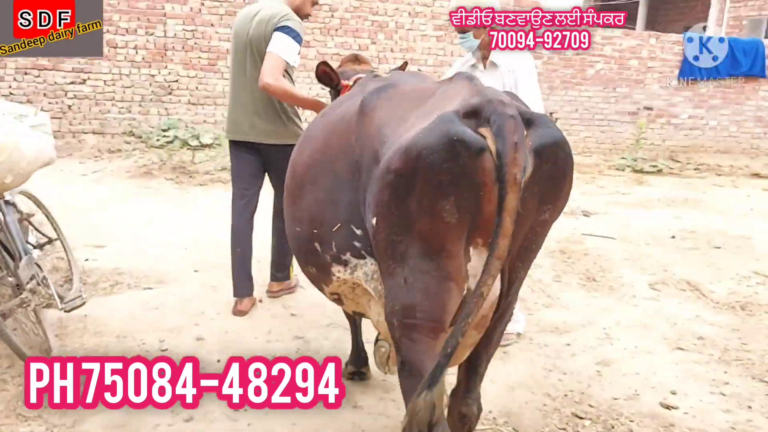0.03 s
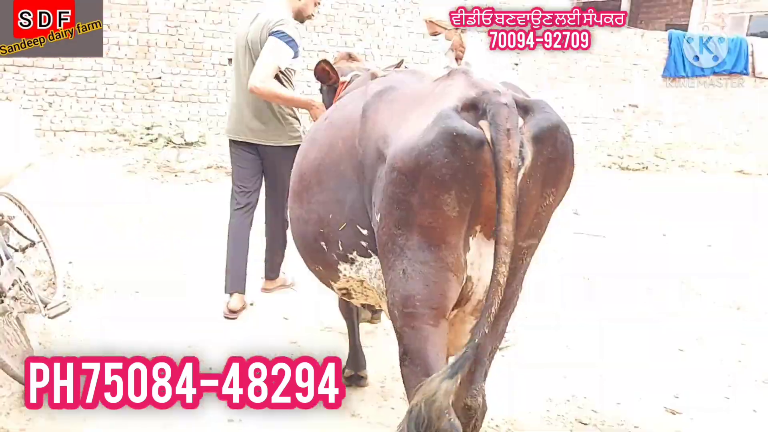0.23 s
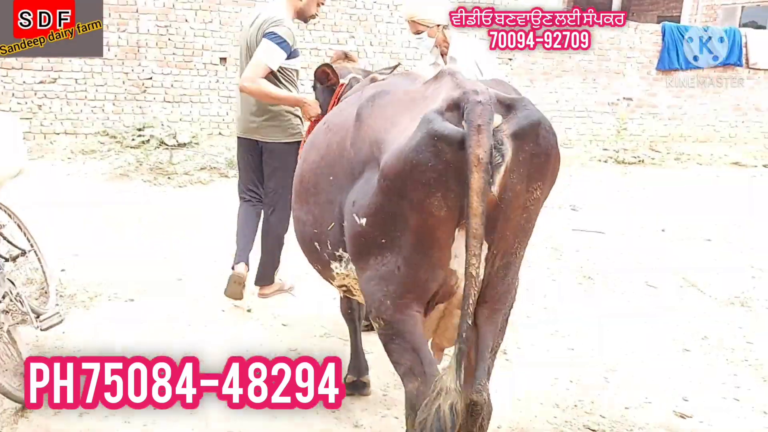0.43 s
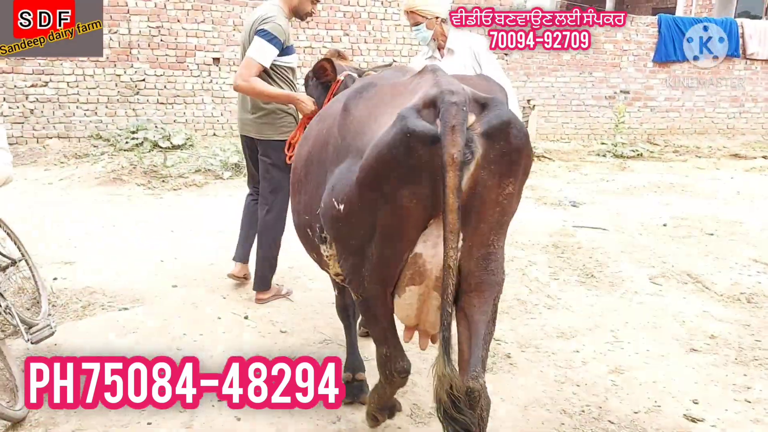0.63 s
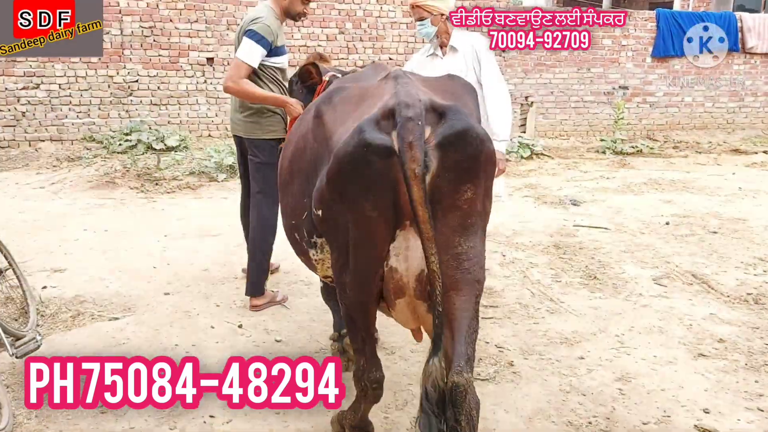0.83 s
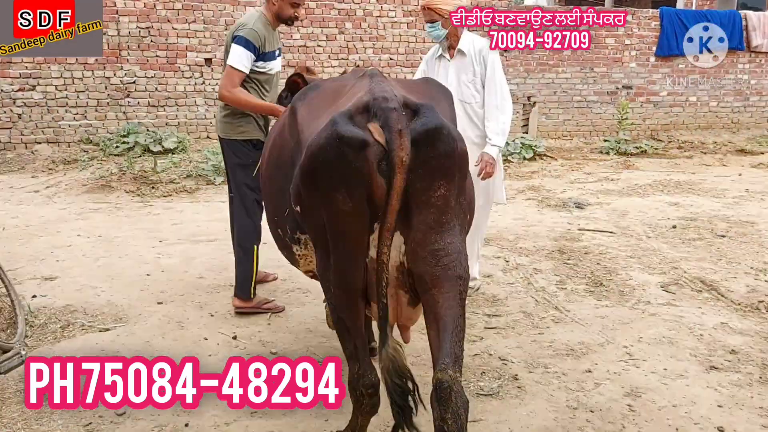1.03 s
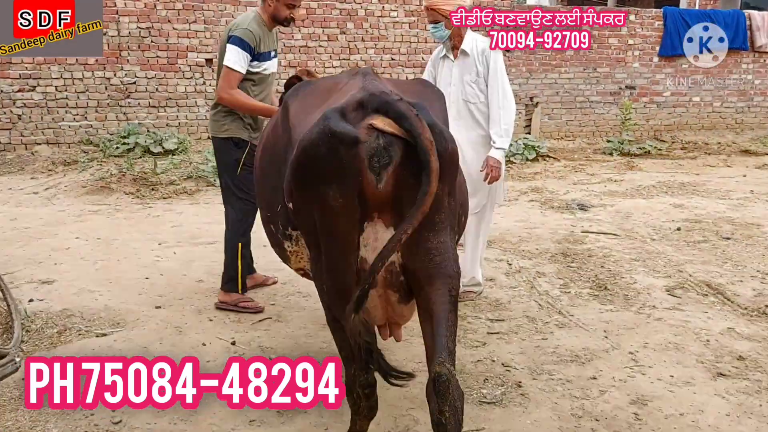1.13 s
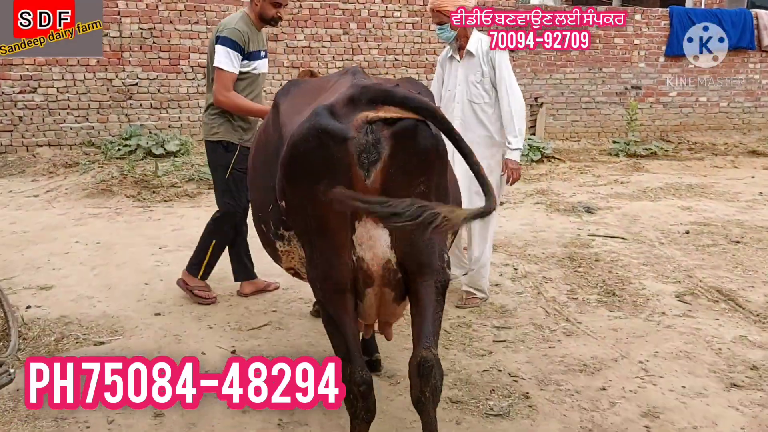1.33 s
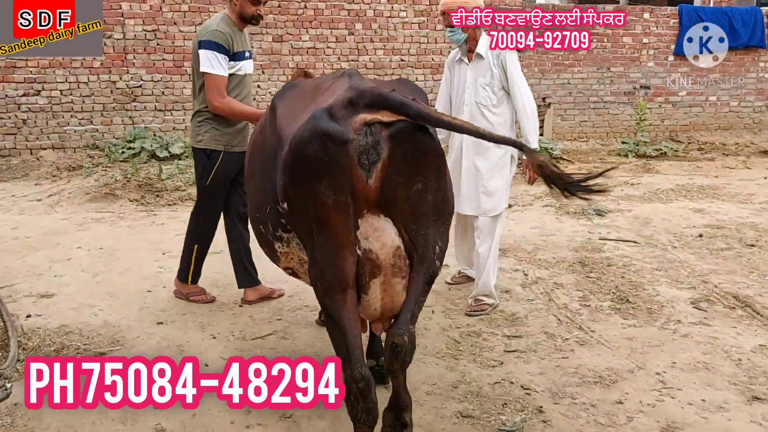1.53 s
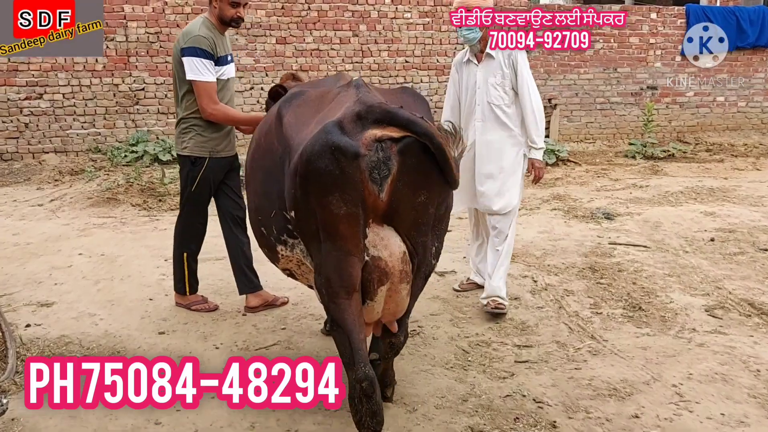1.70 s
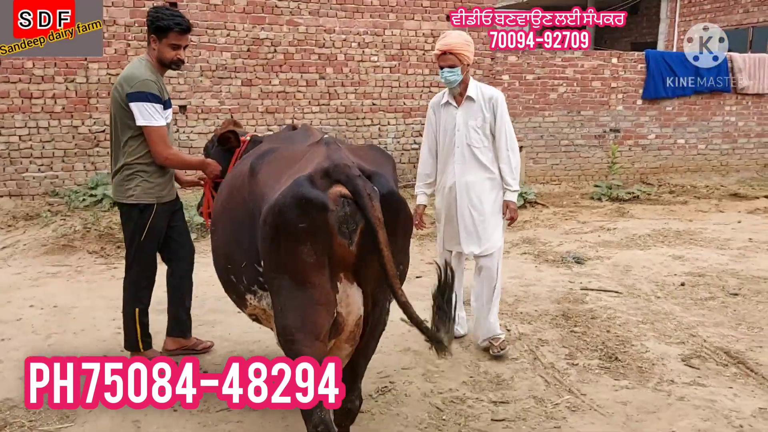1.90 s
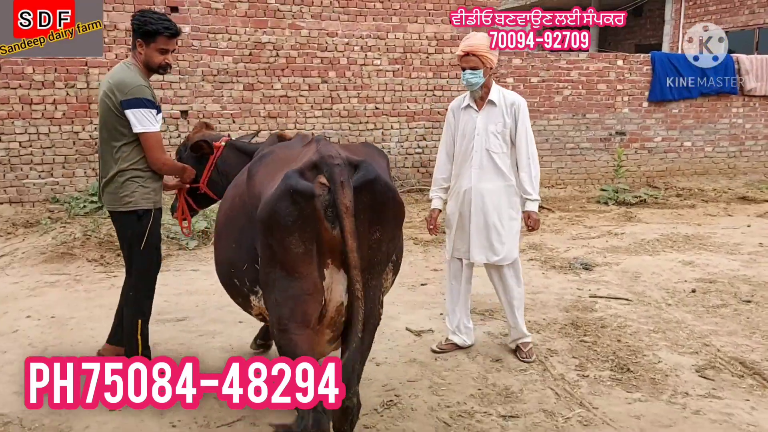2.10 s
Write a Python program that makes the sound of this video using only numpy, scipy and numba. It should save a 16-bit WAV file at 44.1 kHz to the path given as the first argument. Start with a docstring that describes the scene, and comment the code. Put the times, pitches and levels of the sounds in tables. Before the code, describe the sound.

Single deep cow moo swelling from closed-mouth hum to open bellow, with hooves scuffing dry dirt

```python
"""A quiet outdoor bed of shaped noise runs throughout, with hooves and feet scuffing (gated, gritty hiss)
and knocking (damped sines plus noise) on dry dirt. A cow led over the yard gives a soft falling grunt, then
one moo: a rough hum through the nearly shut mouth, a clear open-mouthed bellow and a hoarse, creaking fall
as the mouth closes. Uneven vocal-fold pulses ring moving resonances; small clicks tick during the moo.
Brick walls echo the voice, knocks and clicks."""
import sys
import numpy as np
from scipy import signal
from scipy.fft import rfft, irfft
from scipy.io import wavfile
from scipy.ndimage import map_coordinates
from numba import njit

SR = 44100
rng = np.random.default_rng(int(sys.argv[2]) if len(sys.argv) > 2 else 0)


def file_out(sig):
    """Save sig as 16-bit WAV at sys.argv[1]."""
    # one column per channel
    cols = np.atleast_2d(sig).T
    # limit, then scale
    lim = np.clip(cols, -1, 1)
    pcm = np.round(lim * 32767).astype(np.int16)
    wavfile.write(sys.argv[1], SR, pcm)


N = 95079
T = np.arange(N) / SR
FREQ = np.arange(N + 1) * SR / (2 * N)  # bins of a double-length transform, Hz

# outdoor background spectrum before scaling to unit power [f/Hz, level/dB]
AIR_COLOUR = [(20, -18), (55, -1), (90, -2), (150, 1), (280, -9.5), (480, -7.5), (1000, -18), (1800, -19),
              (2600, -27.5), (5000, -32), (12000, -33.5), (15500, -35)]
AIR_DB, AIR_WANDER_DB, AIR_WIDE_HZ = -58, -2, 1800

# feet dragged over dry dirt [start t/s, length/s, level/dB]
SCUFFS = [(-.02, 0.05, -50.5), (0.03, 0.14, -62.5), (0.177, 0.065, -59), (0.969, 0.28, -44.5),
          (1.25, 0.26, -55), (1.429, 0.041, -58), (1.689, 0.18, -69), (2.127, 0.08, -45)]
# scuff spectrum before scaling to unit power [f/Hz, level/dB]
SCUFF_COLOUR = [(300, 8.5), (2000, 6.5), (4500, -1), (7500, -7.5), (11000, -5), (13500, -5.5), (16000, -47)]
SCUFF_ATTACK_S, SCUFF_RELEASE_S, GRIT_DB = 0.0094, 0.0086, 2

# steps on packed earth [t/s, level/dB, decay/s, knock f/Hz]
STEPS = [(0.088, -42, 0.0016, 406), (.193, -44, 0.0058, 393), (.242, -50, 0.0033, 380),
         (0.282, -49.5, 0.0041, 384), (.379, -47, 0.004, 500), (0.4291, -42.5, 0.0054, 450),
         (.489, -51, .003, 930)]
# spectrum of tick and crumble before scaling to unit power [f/Hz, level/dB]
STEP_COLOUR = [(60, -17), (200, 8.5), (480, 15.5), (900, 2.5), (2300, -1.5), (5000, -18), (15000, -36)]
STEP_TICK_DB, STEP_CRUMBLE_DB = -1, -2.5  # relative to each step's level

# opening grunt [t/s, pitch f/Hz, overtone source level/dB, fundamental level/dB]
GRUNT = [(.49, 151, -88, -74), (.53, 148, -82, -66), (.585, 141.8, -73, -65), (.608, 139.9, -52.5, -42.5),
         (.635, 137.9, -40, -50), (.67, 132.8, -35, -43.5), (.71, 128.6, -35.5, -52),
         (.745, 128.2, -33, -46), (.79, 120, -68.5, -73)]
# grunt resonances before scaling to unit power [f/Hz, level/dB]
GRUNT_COLOUR = [(70, -15.5), (135, 6), (270, -4.5), (400, -23), (650, -14.5), (1000, -19.5), (2000, -18),
                (2700, -22.5), (3200, -38.5), (5000, -29), (7000, -63)]
GRUNT_ROUGH, GRUNT_CREAK, GRUNT_OVERTONES_HZ = .4, .4, 189  # hoarseness and creak run 0-1

# pitch of the moo [t/s, f/Hz]
MOO_PITCH = [(.72, 87), (.824, 99.64), (.918, 110.6), (1.0, 118.7), (1.08, 121.7), (1.13, 122.6),
             (1.44, 121.9), (1.54, 120.4), (1.67, 117.8), (1.76, 115.2), (1.84, 110.1), (1.92, 105.4),
             (2.0, 102.4), (2.15, 97.2)]
# effort driving the folds [t/s, source level/dB]
MOO_EFFORT = [(.69, -80), (.735, -39), (.785, -36), (.81, -31), (.92, -34), (.98, -34), (1.04, -33),
              (1.10, -26), (1.22, -25), (1.42, -24.5), (1.53, -24.5), (1.62, -26.5), (1.8, -26),
              (1.88, -27), (1.95, -30), (2.01, -28.5), (2.07, -38.5), (2.11, -46.5), (2.16, -54)]
# level of the moo's fundamental [t/s, level/dB]
MOO_FUNDAMENTAL = [(.7, -59), (.77, -47), (.82, -41.5), (.92, -36.5), (.975, -41.5), (1.02, -63),
                   (1.075, -39), (1.13, -48), (1.5, -48), (1.68, -50), (1.74, -49), (1.83, -42.5),
                   (1.895, -33.5), (1.97, -41), (2.02, -57), (2.08, -41), (2.12, -51), (2.16, -40)]
# unevenness of the voice [t/s, hoarseness 0-1, creak 0-1]
MOO_ROUGH = [(.72, .7, .5), (.88, .3, .2), (1.02, .16, .05), (1.1, .03, .02), (1.3, .02, .01),
             (1.68, .04, .03), (1.8, .15, .1), (1.92, .22, .28), (1.98, .45, .8), (2.15, .6, .9)]
# mouth opening [t/s, opening: 0 shut, .5 half, 1 wide]
MOUTH = [(1.03, 0.12), (1.075, 0.9), (1.2, 1), (1.5, 0.76), (1.62, 0.82), (1.74, .64), (1.88, 0.59),
         (2.08, 0.36), (2.13, 0.31)]
# throat and mouth resonances, mouth shut, before scaling to unit power [f/Hz, level/dB]
SHUT_MOUTH = [(100, -36), (190, -18), (222, -6.5), (238, 1.5), (290, -7.5), (450, -40), (600, -15.5),
              (740, -18.5), (940, -9), (1150, -12), (1400, -21), (1650, -26.5), (1780, -11.5), (2080, -6),
              (2300, -16), (2510, -14), (2720, -38.5), (3230, -18), (3500, -39), (3850, -29), (4900, -47),
              (5500, -45.5), (8000, -51.5)]
# the same, mouth half open [f/Hz, level/dB]
HALF_MOUTH = [(100, -32), (170, 1.5), (230, -15), (340, -13), (410, 1.5), (455, 5), (550, -14.5), (620, -4),
              (720, -16), (860, -6), (1120, -29.5), (1280, -18), (1420, -8), (1540, -3), (1700, -11.5),
              (1950, -20), (2250, -18), (2600, -34), (2850, -13), (3020, -32.5), (3300, -26), (3600, -22.5),
              (4400, -25.5), (5200, -46), (8000, -52.5)]
# the same, mouth wide open [f/Hz, level/dB]
WIDE_MOUTH = [(122, -26), (244, -16.5), (366, -24.5), (488, -2.5), (610, -24), (732, -20.5), (855, 0.5),
              (977, -11.5), (1100, -27), (1222, -6.5), (1344, -13), (1466, -1.5), (1590, -8.5),
              (1710, -2.5), (1835, -13), (2200, -12.5), (2440, -13), (2570, -36), (2690, -23), (2810, -12),
              (2930, -30), (3180, -16), (3400, -33.5), (3550, -13), (3790, -31.5), (4250, -22), (4700, -76),
              (5300, -38), (6000, -46), (8000, -63.5)]
# lower resonance moving with jaw and tongue [t/s, centre f/Hz, lift/dB]
LOWER = [(1.06, 1470, -1.5), (1.28, 1466, 4.5), (1.52, 1450, 8), (1.63, 1435, 2.5), (1.9, 1410, 13.5),
         (2.03, 1500, 6)]
# middle resonance moving with jaw and tongue [t/s, centre f/Hz, lift/dB]
MIDDLE = [(1.22, 1712, 7), (1.4, 1640, 3.5), (1.62, 1644, 9.5), (1.75, 1690, 10.5), (1.9, 1720, 3),
          (2.01, 1880, 9)]
# upper resonance moving through the call [t/s, centre f/Hz, lift/dB]
UPPER = [(1.02, 3110, 6), (1.11, 3090, 17.5), (1.19, 2880, 13), (1.25, 2790, 7), (1.35, 2680, 12.5),
         (1.56, 2820, 9), (2.0, 2910, -3)]
# broad nasal resonance sinking as the call starts [t/s, centre f/Hz, lift/dB]
NASAL = [(.7, 4493, 25.5), (.82, 4000, 8.5), (.95, 3300, 1)]
LOWER_WIDTH_HZ, MIDDLE_WIDTH_HZ, UPPER_WIDTH_HZ, NASAL_WIDTH_HZ = 27, 140, 45, 500
OVERTONES_HZ, NOSE_SMEAR_S = 135, .008

# vocal folds, shared by grunt and moo
JITTER_CYCLES, JITTER_HZ = .025, 219.9  # timing spread at full hoarseness, rate of change
CREAK_SIZE_DB, CREAK_CYCLES, CREAK_ALTERNATION = 4, .05, .35  # size and timing scales at full creak
PULSE_TOP_HZ, PULSE_SPREAD_S, HISS_DB = 4000, .0055, -3  # hiss level before its high-pass
RASP_DB, RASP_SHARE, RASP_LOW_HZ = 6, 0.79, 1600  # level at full hoarseness, decay in cycles, low cut

# small clicks [t/s, level/dB, ring f/Hz, width/Hz, decay/s]
CLICKS = [(1.041, -26.5, 1490, 130, 0.022), (1.776, -47.5, 8700, 9000, 0.0033),
          (1.81, -28.5, 2200, 690, 0.0045), (1.8144, -56, 10000, 9000, 0.0012),
          (2.062, -53.5, 7000, 9000, 0.0014)]

# wall echoes [delay left/s, delay right/s, level/dB]
WALLS = [(.0328, .0246, -16), (.071, .0665, -18)]
# scatter off the ground and nearby bodies, then off the yard [t60/s, level/dB]
TAILS = [(.11, -6), (.45, -15)]
YARD_DULL_HZ, YARD_THIN_HZ, YARD_WIDE_HZ, YARD_DRIFT_HZ = 6200, 278, 700, .6
# phase between the two microphone ports [f/Hz, left lead/rad]
PORT_PHASE = [(490, 1.16), (850, -1.59), (980, -2.5), (1200, 4.13), (1340, -1.5), (1470, -3), (1590, -2.5),
              (1710, -2), (2300, -3), (2800, 0.5), (4600, -3), (15000, -15)]
# balance of the two microphone ports [f/Hz, left minus right level/dB]
PORT_BALANCE = [(60, 0), (240, 0), (360, 3), (480, -2), (610, -4), (850, -6.5), (980, -7), (1100, 0),
                (1340, -5), (1470, -4), (1600, 0), (1720, -1), (2400, -1), (15000, 0)]
TOP_HZ = 15700


def amp(db):
    """Decibels to gain."""
    return 10 ** (np.asarray(db) / 20)


def curve(rows, axis=1):
    """One column of a table, joined by straight lines in time."""
    rows = np.array(rows)
    return np.interp(T, rows[:, 0], rows[:, axis])


def unit(x):
    """Scale to rms 1."""
    return x / np.sqrt(np.mean(x ** 2))


def walk(hz):
    """Smooth random drift of rms 1, with hz fresh values a second."""
    return unit(map_coordinates(rng.standard_normal(4096), [T * hz], order=3, mode="wrap"))


def at_bins(points):
    """A (f/Hz, value) table read at every bin, joined along log frequency."""
    hz, value = np.array(points).T
    return np.interp(np.log(FREQ + 1), np.log(np.sort(hz)), value)


def filtered(x, response):
    """Apply a frequency response."""
    return irfft(rfft(x, 2 * N) * response)[..., :N]


def body(points):
    """Causal response of unit power with the given spectral shape: minimum phase by folding the cepstrum."""
    cepstrum = irfft(np.log(unit(amp(at_bins(points)))))
    cepstrum[1:N] *= 2
    cepstrum[N + 1:] = 0
    return np.exp(rfft(cepstrum))


def above(hz):
    """Steep high-pass response."""
    return FREQ ** 4 / np.hypot(FREQ ** 4, hz ** 4)


def burst(start, decay):
    """Noise that starts at once and dies away exponentially."""
    return rng.standard_normal(N) * (T >= start) * np.exp(-np.abs(T - start) / decay)


@njit
def resonance(x, hz, width):
    """Band-pass with a moving centre and width, as a state-variable filter."""
    y, band, low = np.empty(len(x)), 0., 0.
    for i in range(len(x)):
        g = np.tan(np.pi * hz[i] / SR)
        k = width[i] / hz[i]
        v = (band + g * (x[i] - low)) / (1 + g * (g + k))
        band = 2 * v - band
        low = low + 2 * g * v
        y[i] = k * v
    return y


def ring(x, hz, width):
    """A fixed resonance with steep skirts: two band-passes in a row."""
    hz, width = hz * np.ones(N), width * np.ones(N)
    return resonance(resonance(x + 1e-18, hz, width), hz, width)


def lift(x, rows, width_hz):
    """Raise or lower the band around a moving centre."""
    gain = amp(curve(rows, axis=2))
    return x + (gain - 1) * resonance(x + 1e-18, curve(rows), width_hz * np.ones(N))


def air():
    """Quiet outdoor bed: wavering coloured noise, close to mono in the bass and wide in the treble."""
    mid, side = filtered(rng.standard_normal((2, N)), body(AIR_COLOUR))
    side = filtered(side, np.clip(FREQ / AIR_WIDE_HZ, .2, 1))
    level = amp(AIR_DB + AIR_WANDER_DB * walk(17.04))
    return level * np.array([mid + side, mid - side])


def scuffs():
    """Feet dragged through dust: hiss whose level flickers like grit."""
    level = 0
    for start, length, db in SCUFFS:
        attack = np.clip((T - start) / SCUFF_ATTACK_S, 0, 1)
        release = np.exp(-np.maximum(T - start - length, 0) / SCUFF_RELEASE_S)
        level = level + amp(db) * attack * release
    grit = unit(amp(GRIT_DB * (walk(650) + .5 * walk(24))))
    return filtered(rng.standard_normal((2, N)) * level * grit, body(SCUFF_COLOUR))


def steps():
    """Steps on the earth: a tick of contact, a dull damped knock and a short crumble."""
    knocks, grit = 0, 0
    for start, db, decay, hz in STEPS:
        age = np.maximum(T - start, 0)
        knocks = knocks + amp(db) * np.sin(2 * np.pi * hz * age) * np.exp(-age / decay)
        tick = amp(STEP_TICK_DB) * np.exp(-((T - start) * SR / 2) ** 2)
        crumble = amp(STEP_CRUMBLE_DB) * burst(start, decay)
        grit = grit + amp(db) * (tick + crumble)
    return knocks + filtered(grit, body(STEP_COLOUR))


def folds(hz, rough, creak):
    """Vocal folds: a pulse a cycle, uneven and alternating in a creak, each trailing rasp, with hiss on top."""
    phase = np.cumsum(hz) / SR + JITTER_CYCLES * rough * walk(JITTER_HZ)
    cycle = np.round(phase).astype(int)
    # each cycle draws its own lateness and strength; both lean the other way on alternate cycles
    late, strong = rng.standard_normal((1024, 2))[cycle].T + CREAK_ALTERNATION * (-1.) ** cycle
    offset = (phase - cycle - CREAK_CYCLES * creak * late) * SR / hz  # samples from the pulse
    pulses = unit(amp(CREAK_SIZE_DB * creak * strong) * np.sinc(offset) * np.exp(-(offset / 10) ** 2))
    top = above(PULSE_TOP_HZ)
    spread = np.exp(-1j * np.pi * PULSE_SPREAD_S * FREQ ** 2 / PULSE_TOP_HZ)  # treble trails bass
    pulses = filtered(pulses, np.sqrt(1 - top ** 2) * spread)
    pulses = pulses + amp(HISS_DB) * filtered(rng.standard_normal(N), top ** 3)
    rasp = unit(rng.standard_normal(N) * np.exp(-(phase % 1) / RASP_SHARE))
    # full hoarseness reaches the lows
    rasp = rough ** 2 * rasp + (1 - rough ** 2) * filtered(rasp, above(RASP_LOW_HZ))
    share = rough * amp(RASP_DB)
    return (pulses + share * rasp) / np.hypot(1, share)


def hum(hz):
    """The fundamental alone: a sine of rms 1."""
    return np.sqrt(2) * np.sin(2 * np.pi * np.cumsum(hz) / SR)


def grunt():
    """Soft, falling grunt: folds ring the throat over a strong fundamental, before the voice drops low."""
    hz = curve(GRUNT)
    sounding = (T > GRUNT[0][0]) * (T < GRUNT[-1][0])
    source = folds(hz, GRUNT_ROUGH, GRUNT_CREAK) * amp(curve(GRUNT, axis=2)) * sounding
    overtones = filtered(source, body(GRUNT_COLOUR) * above(GRUNT_OVERTONES_HZ))
    return overtones + hum(hz) * amp(curve(GRUNT, axis=3)) * sounding


def moo():
    """Folds ring a throat whose resonances change with the mouth opening; the fundamental hums below."""
    hz = curve(MOO_PITCH)
    source = folds(hz, curve(MOO_ROUGH), curve(MOO_ROUGH, axis=2)) * amp(curve(MOO_EFFORT))
    mouth = np.clip(curve(MOUTH), 0, 1)
    nose = np.exp(1j * np.angle(rfft(burst(0, NOSE_SMEAR_S), 2 * N)))  # nasal passages smear each pulse
    shapes = (body(SHUT_MOUTH) * nose, body(HALF_MOUTH), body(WIDE_MOUTH))
    overtones = 0
    for k, shape in enumerate(shapes):
        share = np.maximum(1 - np.abs(2 * mouth - k), 0)  # crossfade between neighbouring openings
        overtones = overtones + filtered(source * share, shape * above(OVERTONES_HZ))
    overtones = lift(overtones, LOWER, LOWER_WIDTH_HZ)
    overtones = lift(overtones, MIDDLE, MIDDLE_WIDTH_HZ)
    overtones = lift(overtones, UPPER, UPPER_WIDTH_HZ)
    overtones = lift(overtones, NASAL, NASAL_WIDTH_HZ)
    return (overtones + hum(hz) * amp(curve(MOO_FUNDAMENTAL))) * (T > MOO_EFFORT[0][0])


def clicks():
    """Short ticks: a dying noise burst through one resonance each."""
    total = 0
    for start, db, hz, width, decay in CLICKS:
        makeup = np.sqrt(SR / width)  # a narrow band passes less noise
        total = total + amp(db) * ring(burst(start, decay), hz, width) * makeup
    return total


def scatter(x):
    """Diffuse tails at one spot in the yard: decaying noise, dulled, and alike left and right in the bass."""
    tail = 0
    for t60, db in TAILS:
        tail = tail + amp(db) * unit(rng.standard_normal((2, N)) * np.exp(-np.log(1000) * T / t60))
    mid, side = rfft(tail / np.sqrt(2 * N), 2 * N) / np.hypot(1, FREQ / YARD_DULL_HZ)
    side = side * np.minimum(FREQ / YARD_WIDE_HZ, 1)
    return filtered(x, np.array([mid + side, mid - side]))


def yard(x):
    """Direct sound at two ports, echoes off the walls, and scatter that shifts as the cow walks."""
    lead = np.exp(.5j * at_bins(PORT_PHASE) * np.minimum(FREQ / PORT_PHASE[0][0], 1))
    direct = filtered(x, np.array([lead, 1 / lead]))
    thinned = filtered(x, FREQ / np.hypot(FREQ, YARD_THIN_HZ))  # reflections lose bass
    echoes = 0
    for left, right, db in WALLS:
        delayed = [np.interp(T - lag, T, thinned, left=0) for lag in (left, right)]
        echoes = echoes + amp(db) * np.array(delayed)
    turn = 2 * np.pi * YARD_DRIFT_HZ * T
    tails = np.cos(turn) * scatter(thinned) + np.sin(turn) * scatter(thinned)
    balance = amp(at_bins(PORT_BALANCE) / 2)
    return filtered(direct + echoes + tails, np.array([balance, 1 / balance]))


def scene():
    """Cow, steps and clicks placed in the yard, with scuffs and background laid in dry."""
    in_yard = moo() + grunt() + steps() + clicks()
    return yard(in_yard) + scuffs() + air()


def record(dry):
    """The recorder cuts the top with a steep elliptic low-pass."""
    return signal.sosfilt(signal.ellip(10, .2, 80, TOP_HZ, fs=SR, output="sos"), dry)


dry = scene()
out = record(dry)
file_out(out)
```